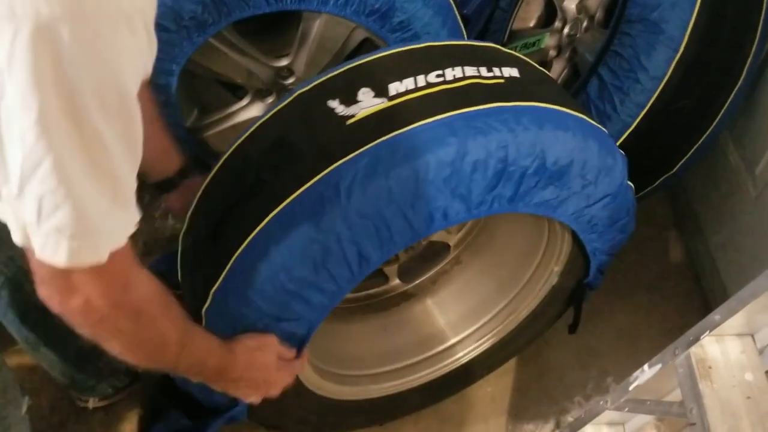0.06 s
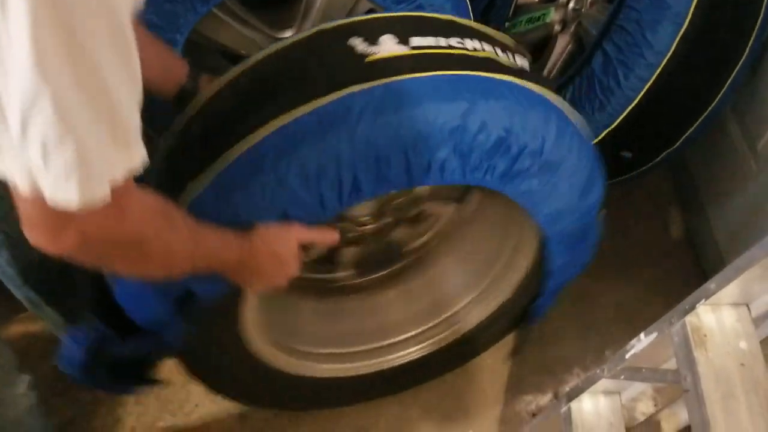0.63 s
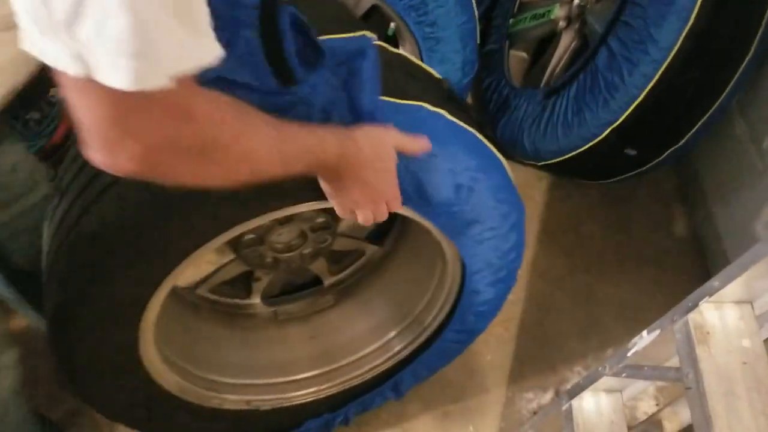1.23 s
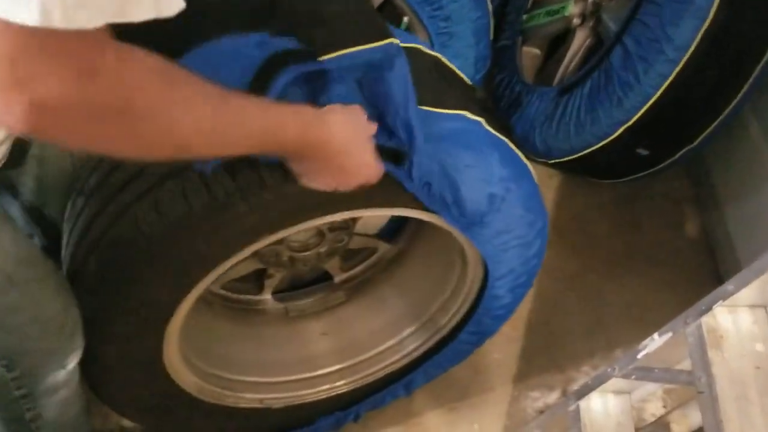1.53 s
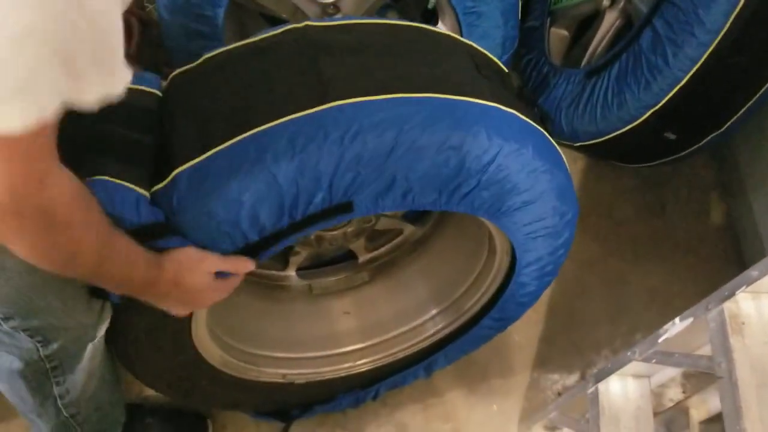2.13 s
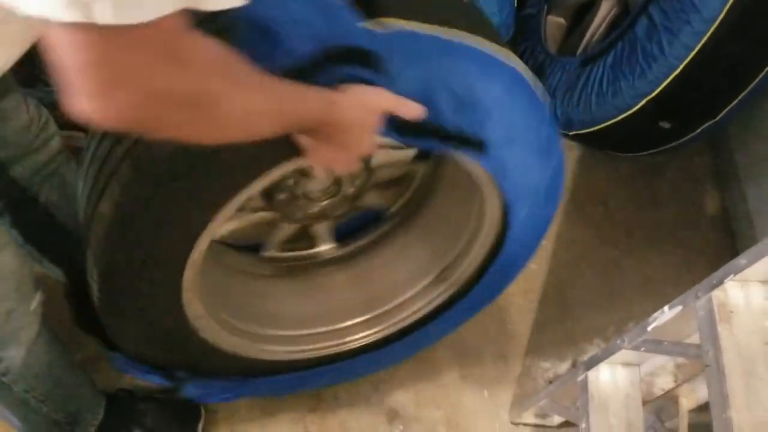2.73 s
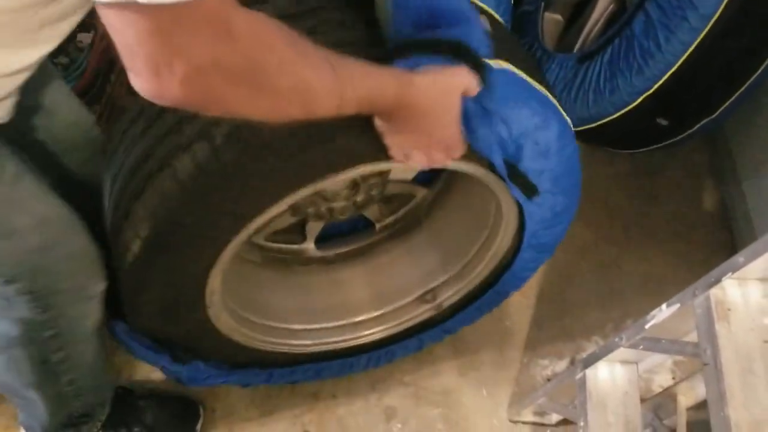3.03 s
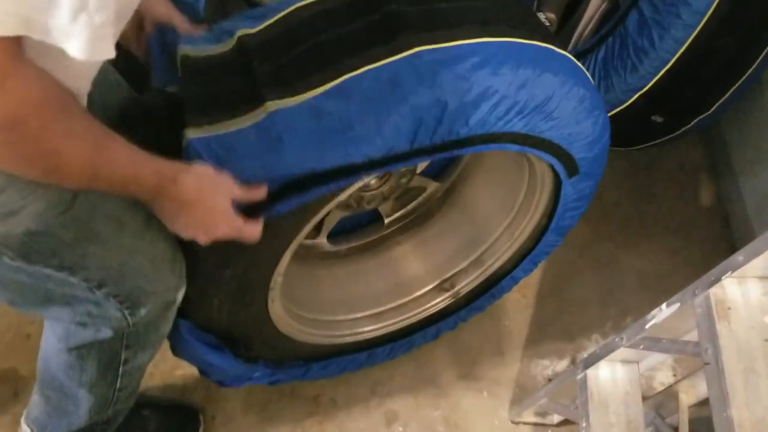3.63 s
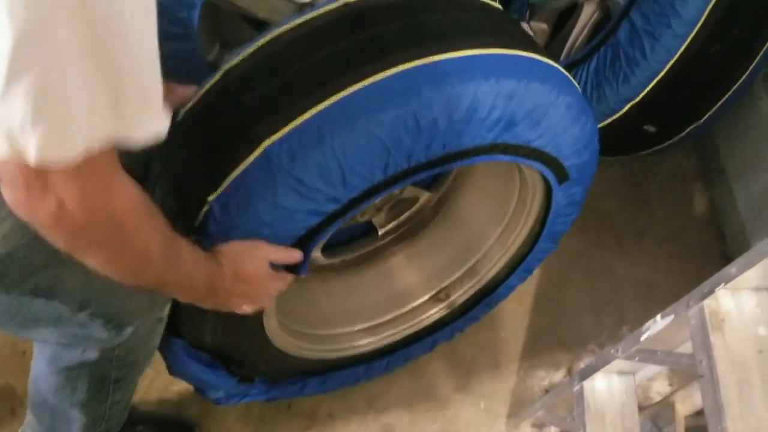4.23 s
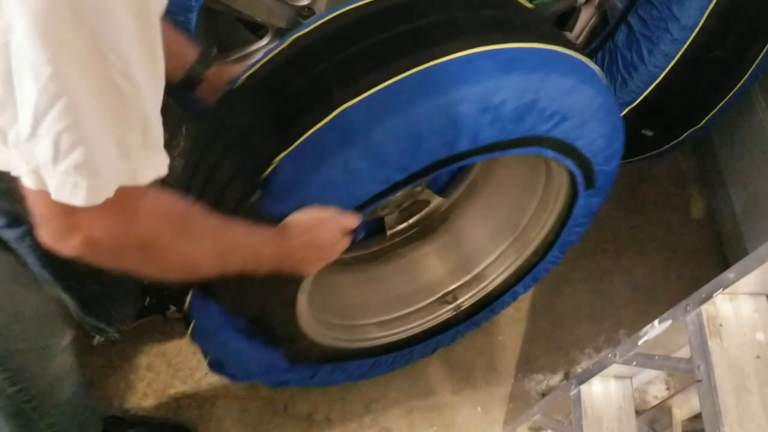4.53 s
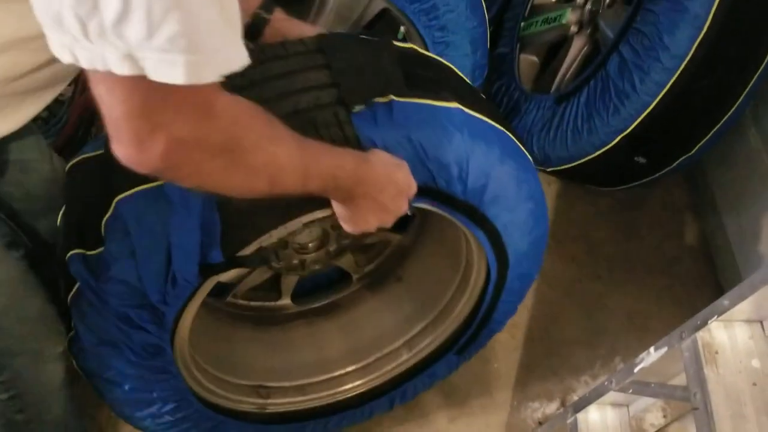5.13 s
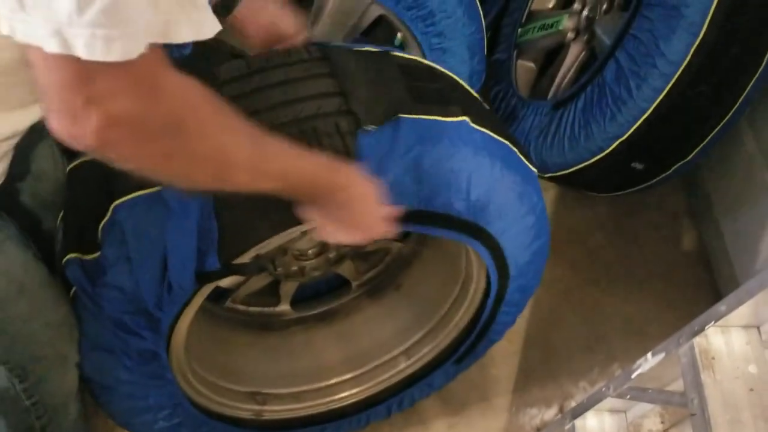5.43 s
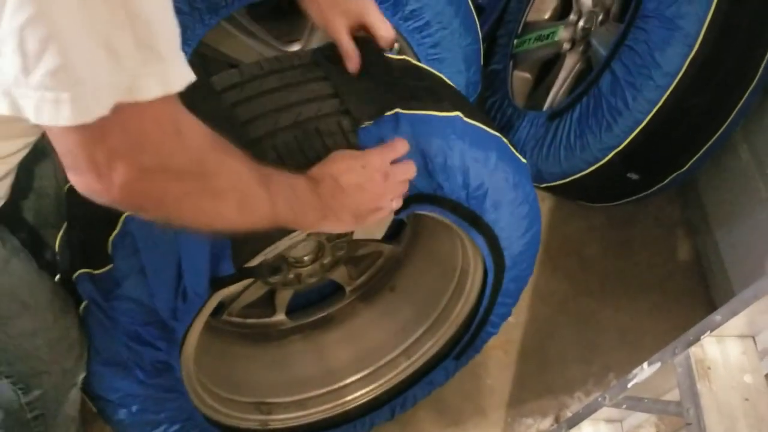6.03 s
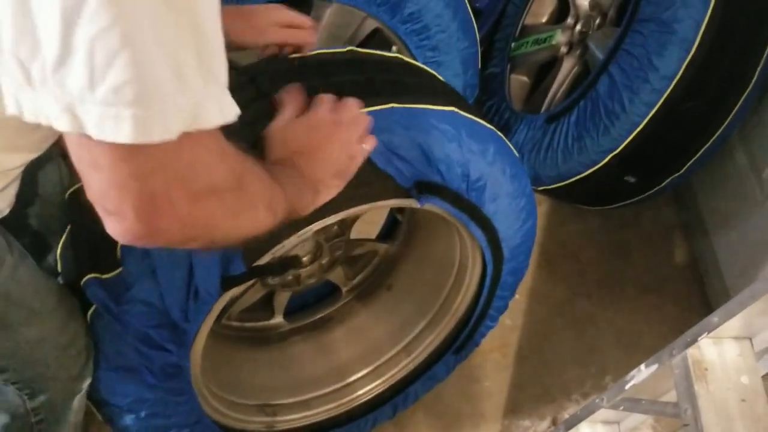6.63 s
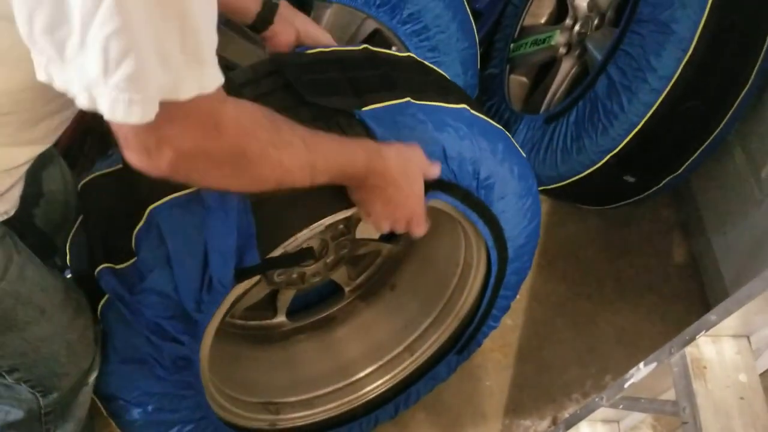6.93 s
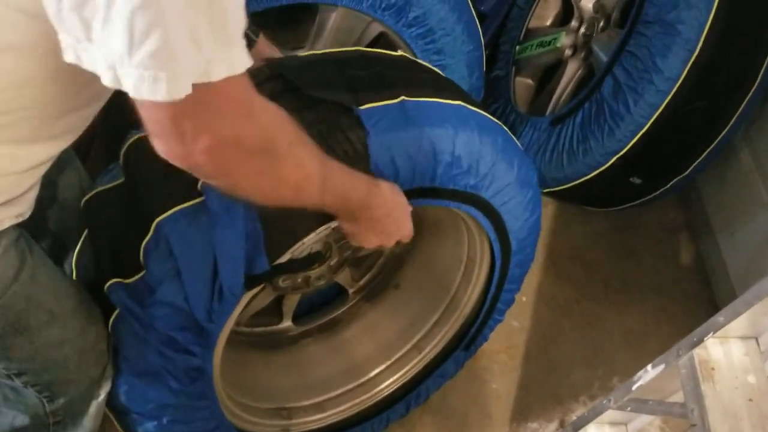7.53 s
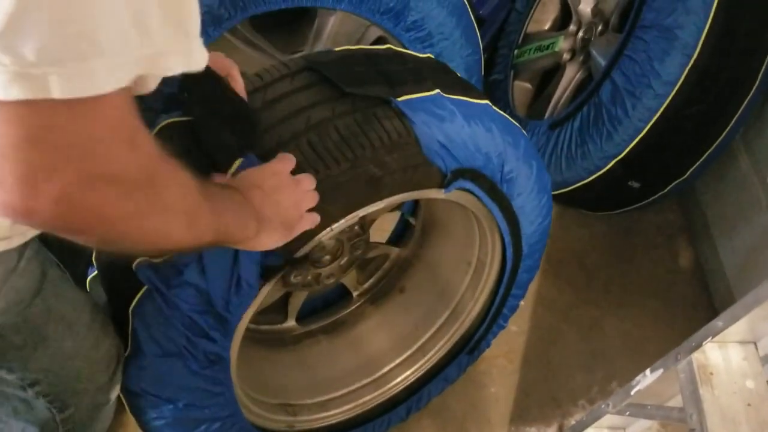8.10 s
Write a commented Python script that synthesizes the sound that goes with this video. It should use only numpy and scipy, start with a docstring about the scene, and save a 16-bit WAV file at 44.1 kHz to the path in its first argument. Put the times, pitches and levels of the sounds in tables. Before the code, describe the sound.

In a garage, a stiff nylon cover is tugged over a car tire, hissing, crinkling and rasping against the tread close to the microphone. Two long pulls come first, and during the second the wheel rocks with a cluster of dull, ringing knocks. Shorter rubs follow, with tiny crease snaps, soft rubber bumps and one sharp rip of sliding cloth near the end. Faint room hum lies underneath.

```python
"""Stiff nylon hisses and crinkles as a cover is tugged, stroke by stroke, over a car tire in a garage.
The weave sticks and slips, rasps on the tread and rips across it in quick jerks; creases snap and
the hem slaps. Hands and knees bump the rubber, and the rocked wheel knocks dully, rings in its air
cavity and rolls a little. Underneath lie room air, a faint hum and a low drone that soon dies away."""
import sys
import numpy as np
from scipy import signal
from scipy.fft import rfft, irfft, next_fast_len
from scipy.io import wavfile

SR = 44100
rng = np.random.default_rng(int(sys.argv[2]) if len(sys.argv) > 2 else 0)


def file_out(sig):
    """Save sig as 16-bit WAV at sys.argv[1]."""
    # one column per channel
    cols = np.atleast_2d(sig).T
    # limit, then scale
    lim = np.clip(cols, -1, 1)
    pcm = np.round(lim * 32767).astype(np.int16)
    wavfile.write(sys.argv[1], SR, pcm)


N = 368670
TIME = np.arange(N) / SR

# Tone curves of the sliding cloth. Each row: frequency in Hz, relative level in dB.
WEAVE_TONE = [(1000, -41), (2000, -10), (3000, -2), (4200, 0), (5300, 0), (7000, -2.5), (8500, -6.5),
              (11000, -9.5), (16000, -26)]
FIBRE_TONE = [(5000, -37), (7500, 3.5), (9500, 2.5), (16000, -5)]
CRUMPLE_TONE = [(600, -27.5), (1100, -1), (1500, 0), (2100, 0.5), (2800, -3), (4000, -8), (8000, -13.5)]
TREAD_TONE = [(90, -22.5), (170, -5), (250, -5), (340, 4), (480, 0), (750, 2.5), (1050, 3), (1400, -0.5),
              (2500, -34)]
CRINKLE_TONE = [(600, -38), (1400, -1.5), (2500, 1), (4000, 3), (7000, 3), (16000, -10)]
BILLOW_TONE = [(30, -23), (70, 1.5), (100, 4.5), (135, -2.5), (200, -3), (280, -17.5), (500, -20.5)]


def sliding_cloth():
    """The weave sticks and slips under one unsteady grip; small folds crackle and slack cloth heaves."""
    hiss, rasp, sizzle = strokes()
    # crumple and heave ride a blend of the hiss and rasp envelopes
    crumple = from_db(-1.17) * hiss * (rasp / hiss) ** 0.48
    slack = from_db(-13) * hiss * (rasp / hiss) ** 0.76
    heave = np.hypot(slack, from_db(-74.5)) * noise(BILLOW_TONE)
    grip_db = 1.26 * drift(30.5)
    weave = hiss * from_db(-3.5 + grip_db + 0.42 * drift(26)) * noise(WEAVE_TONE)
    fibres = sizzle * from_db(6.5 + grip_db) * noise(FIBRE_TONE)
    panels = crumple * from_db(-0.54 + grip_db + 1.2 * drift(60)) * noise(CRUMPLE_TONE)
    tread = rasp * from_db(-0.7 + grip_db + 0.69 * drift(60)) * noise(TREAD_TONE)
    catches = rasp * from_db(-2.5) * grains(TREAD_TONE, per_s=260, spread_db=3.3)
    buckles = crumple * from_db(-7) * grains(CRUMPLE_TONE, per_s=160, spread_db=3.8)
    folds = hiss * from_db(-7.5) * grains(CRINKLE_TONE, per_s=420, spread_db=4.8)
    crackle = garage(folds + buckles + catches, near_db=-3, far_db=-17)
    return echoes(weave + fibres + panels + tread) + heave + crackle


# Two long pulls over the tread, one envelope each.
# Each row: time in seconds, then relative levels of weave hiss, tread rasp and fine sizzle in dB.
LONG_PULLS = [
    [(0.55, -49, -63, -59), (0.582, -54, -68.5, -62), (0.744, -49, -58, -55.5), (0.848, -37.5, -51, -48.5),
     (0.968, -35.5, -51.5, -44.5), (1.052, -40, -52, -49), (1.072, -39, -51.5, -43.5),
     (1.388, -40.5, -54.5, -48), (1.474, -40, -49, -51), (1.5, -46.5, -52.5, -51), (1.566, -41.5, -52, -58),
     (1.682, -30.5, -41, -39), (1.786, -28.5, -37, -38.5), (1.852, -34, -41, -43), (1.91, -32, -47, -41),
     (2.04, -51, -57, -66)],
    [(2.56, -51.5, -75, -66), (2.71, -40.5, -58.5, -48), (2.776, -40, -47, -49), (2.834, -48.5, -59, -57),
     (2.896, -38, -52, -47), (2.964, -47, -54, -50), (3.058, -39.5, -48, -48.5), (3.086, -43, -54, -55),
     (3.144, -36, -52.5, -43.5), (3.2, -43.5, -53.5, -53), (3.318, -34.5, -43.5, -40),
     (3.362, -35, -42, -45), (3.41, -40, -49, -48), (3.508, -31, -44, -40), (3.6, -34, -46, -44.5),
     (3.66, -47, -54.5, -52)],
]
# Short rubs as hands gather, tuck and smooth the cloth. Each row: crest in seconds, relative hiss level
# in dB, rise in seconds, fall in seconds, rasp against hiss in dB, sizzle against hiss in dB.
SHORT_RUBS = [(0.009, -44, 0.034, 0.057, -11, -12), (0.122, -42.5, 0.071, 0.13, -13.5, -7),
              (0.22, -45.5, 0.07, 0.057, -17.5, -5.5), (0.432, -47.5, 0.059, 0.19, -25, -8.5),
              (2.123, -47.0, 0.075, 0.14, -7, -6), (2.198, -45, 0.047, 0.045, -7.5, -8),
              (2.489, -45, 0.099, 0.067, -10, -12), (3.713, -37, 0.044, 0.19, -10, -12.5),
              (3.836, -30.5, 0.02, 0.05, -9.5, -8.5), (4.01, -37.5, 0.026, 0.066, -19, -6),
              (4.07, -41, 0.018, 0.083, -13, -14), (4.197, -46.5, 0.032, 0.11, -22, -7.5),
              (4.673, -57, 0.075, 0.23, -29, -9), (4.914, -46.5, 0.02, 0.048, -10, -9.5),
              (5.038, -47.5, 0.032, 0.043, -12.5, -9), (5.207, -41.5, 0.047, 0.088, -28, -9),
              (5.302, -44, 0.084, 0.16, -9, -8.5), (5.405, -35, 0.037, 0.044, -13.5, -10),
              (5.578, -39, 0.03, 0.048, -23, -9.5), (5.704, -43, 0.027, 0.048, -14.5, -8),
              (5.89, -41, 0.071, 0.067, -16, -9), (5.997, -38.5, 0.025, 0.077, -21, -7.5),
              (6.108, -36.5, 0.071, 0.046, -18, -6), (6.225, -42, 0.085, 0.079, -13.5, -12.5),
              (6.36, -46.5, 0.072, 0.15, -14.5, -8.5), (6.585, -52, 0.042, 0.071, -21, -3),
              (6.693, -44.5, 0.036, 0.077, -25, -7), (6.758, -49.5, 0.035, 0.065, -19.5, -3),
              (6.882, -51, 0.086, 0.17, -38, -4), (7.317, -34.5, 0.064, 0.044, -13, -9),
              (7.451, -45.5, 0.11, 0.069, -13, -6), (7.596, -38, 0.033, 0.077, -16, -11.5),
              (7.806, -44.5, 0.043, 0.062, -12, -5), (7.946, -53, 0.026, 0.067, -9, -4),
              (8.16, -49, 0.047, 0.082, -12.5, -14), (8.246, -44.5, 0.048, 0.028, -15, -14.5),
              (8.344, -39.5, 0.034, 0.076, -12, -13)]


def strokes():
    """Envelopes of hiss, rasp and sizzle: every pull and rub of the cloth, summed in power."""
    rest = from_db([-61.5, -82, -77])  # held cloth never lies quite still
    power = np.outer(rest ** 2, np.ones(N))
    pull_fade_s = 0.045
    for pull in LONG_PULLS:
        s, hiss_db, rasp_db, sizzle_db = np.transpose(pull)
        gains = from_db([np.interp(TIME, s, db) for db in (hiss_db - 0.7, rasp_db + 1.35, sizzle_db)])
        outside_s = np.abs(TIME - np.clip(TIME, s[0], s[-1]))
        fade = np.exp(-np.minimum(outside_s / pull_fade_s, 20))
        power += (gains * fade) ** 2
    for s, db, rise, fall, rasp_db, sizzle_db in SHORT_RUBS:
        span = slice(*np.searchsorted(TIME, [s - 4 * rise, s + 4 * fall]))
        from_crest = np.maximum((s - TIME[span]) / rise, (TIME[span] - s) / fall)
        swell = np.exp(-from_crest ** 1.42)  # exponent 1 is a pointed crest, 2 a bell
        power[:, span] += np.outer(from_db([db, db + rasp_db, db + sizzle_db]), swell) ** 2
    return np.sqrt(power)


# Quick jerks of the cloth. Each row: crest in seconds, level in dB, rise in seconds, decay in seconds.
CLOTH_JERKS = [(0.125, -33, 0.0025, 0.0081), (1.095, -42, .008, 0.017), (3.838, -38, 0.0088, 0.026),
               (4.01, -42, .004, 0.012), (5.88, -32, .008, 0.009), (7.588, -20, 0.0037, 0.014)]
# Their bright rip. Each row: frequency in Hz, relative level in dB.
RIP_TONE = [(200, -23.5), (900, -8.5), (2200, -5.5), (3400, 2), (6500, 4.5), (10000, 2.5), (16000, -10)]


def jerks():
    """A sudden pull rips the weave across the rubber in a dense burst of slips."""
    speed = sum(from_db(db) * np.exp(-np.maximum((s - TIME) / rise, (TIME - s) / decay))
                for s, db, rise, decay in CLOTH_JERKS)
    slips = grains(RIP_TONE, per_s=9000, spread_db=0.64)
    return garage(speed * slips, near_db=-7.5, far_db=-38)


# The sharpest creases letting go. Each row: start in seconds, relative level in dB, pitch in Hz.
CREASE_SNAPS = [(0.008, -24, 6400), (0.1235, -26, 5660), (0.400, -23, 3440), (0.407, -27, 6500),
                (0.515, -26.5, 3700), (1.4595, -16.5, 3400), (3.3047, -19, 4900), (3.704, -19, 4760),
                (3.783, -22, 4100), (3.813, -19.5, 3150), (3.985, -26, 6200), (4.213, -26, 3080),
                (4.225, -27.5, 2540), (4.261, -35, 2700), (4.386, -28, 3570), (4.641, -37, 3450),
                (4.676, -38, 3800), (5.30, -22.5, 2710), (5.3747, -17, 2100), (5.541, -25, 4830),
                (5.818, -29, 1500), (5.937, -21.5, 2300), (6.107, -21, 1700), (6.572, -25.5, 6200),
                (7.7745, -29, 6030), (8.3098, -24.5, 3600)]
# The hem hitting the wheel.
# Each row: start in seconds, relative level in dB, pitch in Hz, ring time (t60) in seconds.
HEM_SLAPS = [(6.205, -16.5, 1970, 0.011), (6.4045, -25.5, 2160, 0.0072), (6.413, -34, 2600, 0.0053),
             (6.571, -36, 1550, 0.0056)]


def snaps_and_slaps(crease_t60=0.0036):
    """Creases tick briefly as they snap; the slapping hem rings lower and longer."""
    creases = [(*row, crease_t60) for row in CREASE_SNAPS]
    snaps = from_db(-4) * flicks(creases, crack_t60=0.0065, crack_db=-5)
    slaps = from_db(-3) * flicks(HEM_SLAPS, crack_t60=0.013, crack_db=-3)
    return garage(snaps, near_db=-3, far_db=-2) + garage(slaps, near_db=2, far_db=-4.5, near_t60=0.1)


def flicks(rows, crack_t60, crack_db):
    """Taut cloth lets go: a crack and a short ring of the panel, its phase lagging on the left."""
    out, t = np.zeros((2, N)), TIME[:SR // 10]
    cracks = colour(rng.standard_normal((2, N)), CRINKLE_TONE)
    for k, (s, db, hz, ring_t60) in enumerate(rows):
        ring = np.sin(2 * np.pi * hz * t - [[np.pi / 3], [0]]) * from_db(-60 * t / ring_t60)
        crack = cracks[:, k * len(t):(k + 1) * len(t)] * from_db(crack_db - 60 * t / crack_t60)
        add(out, s, from_db(db) * (ring + crack))
    return out


# The wheel knocking as it rocks. Each row: start in seconds, relative level in dB.
WHEEL_KNOCKS = [(2.751, -32.5), (2.8985, -24), (2.939, -31.5), (3.023, -25), (3.130, -24), (3.216, -33.5),
                (3.364, -33.5), (4.895, -46.5), (6.465, -48.5), (6.735, -50)]
# Modes of tire and rim. Each row: pitch in Hz, relative level in dB, ring time (t60) in seconds.
WHEEL_MODES = [(99, -24.5, 0.35), (198.6, -23.5, 1.1), (230, -32, 0.11), (311, -8.5, 0.069),
               (390, -1.5, 0.032), (453, -7.5, 0.077), (557, -16, 0.053), (727, -13, 0.076),
               (902, -7, 0.087), (1060, -17, 0.12), (1380, -21, 0.071), (1670, -26, 0.035)]
# The dry attack of a knock. Each row: frequency in Hz, relative level in dB.
TOCK_TONE = [(200, -48), (500, 13), (800, 11), (1600, 14), (2000, -25), (4000, -42)]


def wheel_knocks(tock_t60=0.046):
    """Each knock gives a dry tock and rings carcass, air cavity and rim."""
    out, t = np.zeros((2, N)), TIME[:SR]
    contact = noise(TOCK_TONE)
    for s, db in WHEEL_KNOCKS:
        vary_db = 1.8 * rng.standard_normal(len(WHEEL_MODES))
        ring = np.zeros(len(t))
        for k, (hz, mode_db, t60) in enumerate(WHEEL_MODES):
            polarity = (-1) ** (k // 3)  # groups of modes swing in opposite sense
            ring += polarity * from_db(mode_db + vary_db[k] - 60 * t / t60) * np.sin(2 * np.pi * hz * t)
        start = int(s * SR)
        tock = contact[:, start:start + len(t)] * from_db(-1.5 - 60 * t / tock_t60)
        add(out, s, from_db(db) * (ring + tock))
    return from_db(-5.5) * garage(out, near_db=-25, far_db=-3.5)


# Hand and knee meeting the tire. Each row: start in seconds, level in dB, pitch in Hz.
RUBBER_BUMPS = [(1.70, -46, 169), (1.756, -40, 238), (1.833, -41, 90), (2.765, -45.5, 161),
                (2.805, -42, 88), (5.386, -50, 137), (5.825, -56, 104), (6.675, -53, 110),
                (7.274, -44.5, 167), (7.306, -48.5, 145)]


def bumps(swell_s=0.0093):
    """Damped rubber answers a soft push with a few dull cycles that swell and fade."""
    out, t = np.zeros((2, N)), TIME[:SR // 4]
    envelope = t / swell_s * np.exp(1 - t / swell_s)
    for s, db, hz in RUBBER_BUMPS:
        add(out, s, from_db(db) * envelope * np.sin(2 * np.pi * hz * t))
    return garage(out, near_db=-17, far_db=-8.5)


# Short rolls on the floor. Each row: start in seconds, time to release in seconds, relative level in dB.
TIRE_ROLLS = [(2.76, 0.31, -52.5), (4.885, 0.053, -65)]
# Their low rumble. Each row: frequency in Hz, relative level in dB.
RUMBLE_TONE = [(15, -11), (30, 8), (60, -29), (80, -10), (97, 18), (120, -47), (200, -32), (400, -35)]


def rolling(attack_s=0.02, release_db_per_s=44):
    """The rolling tire rumbles unevenly and shakes the slack cloth, then settles."""
    envelope = np.zeros(N)
    for s, length, db in TIRE_ROLLS:
        attack = np.clip((TIME - s) / attack_s, 0, 1)
        envelope += attack * from_db(db - release_db_per_s * np.maximum(TIME - s - length, 0))
    wobble = from_db(2 * drift(25))
    return envelope * wobble * (noise(RUMBLE_TONE) + from_db(3) * noise(BILLOW_TONE))


# The air of the garage. Each row: frequency in Hz, relative level in dB.
AIR_TONE = [(20, -4), (60, 13), (110, 9.5), (170, -15), (280, -22), (700, -48), (3000, -36), (16000, -21)]


def room_tone(hum_hz=58.8, drone_hz=93.6, drone_hold_s=0.8, fade_db_per_s=42):
    """Room air and a faint hum stay throughout; a low drone holds, then dies away."""
    hum = from_db(-70 + drift(4.3)) * np.sin(2 * np.pi * hum_hz * TIME)
    drone_level = from_db(-60 - fade_db_per_s * np.maximum(TIME - drone_hold_s, 0))
    drone = drone_level * np.sin(2 * np.pi * drone_hz * TIME + 0.56 * drift(1.9))
    return np.sqrt(2) * (hum + drone) + from_db(-70) * noise(AIR_TONE)


# Early reflections off floor, wheel and arm. Each row: left delay in ms, right delay in ms, level in dB.
REFLECTIONS = [(3.7, 3.4, -18.5), (6.1, 6.9, -20.5), (9.4, 7.6, -10.5), (13.3, 14.9, -15)]


def echoes(x):
    """Nearby surfaces comb the rustle with a fine, unmoving ripple."""
    out = x.copy()
    for left_ms, right_ms, db in REFLECTIONS:
        for side, ms in enumerate((left_ms, right_ms)):
            out[side] += from_db(db) * np.interp(TIME - ms / 1000, TIME, x[side], left=0)
    return out


def garage(x, near_db, far_db, near_t60=0.045, far_t60=0.58):
    """Direct sound, quick scatter from wheel and floor, then the tail of the room."""
    t = TIME[:SR // 2]
    near, far = rng.standard_normal((2, 2, len(t)))
    near = near * from_db(-60 * t / near_t60) * (t > .001)
    far = far * from_db(-60 * t / far_t60) * (t > .008)
    response = (from_db(near_db) * rms_one(near) + from_db(far_db) * rms_one(far)) / np.sqrt(len(t))
    return x + convolve(x, response)


# Stereo image of the noise layers. Each row: frequency in Hz, left-right likeness from 0 to 1.
STEREO_LIKENESS = [(60, 0.63), (300, 1), (700, 0.36), (2000, 0.39), (3500, 0.13), (16000, .02)]


def noise(tone):
    """Stereo noise shaped by a tone curve, narrow in the bass and wide in the treble; rms 1."""
    size = next_fast_len(N, True)
    hz = np.fft.rfftfreq(size, 1 / SR)
    alike = np.clip(at_hz(STEREO_LIKENESS, hz), 0, 1)
    mid, side = rfft(rng.standard_normal((2, size)))
    stereo = np.sqrt(1 + alike) * mid + np.sqrt(1 - alike) * side * [[1], [-1]]
    return rms_one(irfft(stereo * from_db(at_hz(tone, hz)), size)[:, :N])


def grains(tone, per_s, spread_db):
    """Tiny clicks of uneven size from all over the cloth, each with its own left-right lag; rms 1."""
    at = np.flatnonzero(rng.random(N) < per_s / SR)
    size = from_db(spread_db * np.minimum(rng.exponential(1, N), 3.4)) * rng.choice([-1, 1], N)
    lag = rng.integers(-9, 10, N)  # samples
    clicks = np.zeros((2, N))
    clicks[0, at] = size[at]
    clicks[1, (at + lag[at]) % N] = size[at]
    return rms_one(colour(clicks, tone))


def drift(rate_hz, hop=20):
    """Smooth random modulation; rms about 1."""
    pole = np.exp(-2 * np.pi * rate_hz * hop / SR)
    white = rng.standard_normal(2 * N // hop)
    slow = signal.lfilter([1], [1, -2 * pole, pole * pole], white)[-(N // hop):]
    return np.interp(np.arange(N) / hop, np.arange(len(slow)), rms_one(slow))


def colour(x, tone, column=1, size=4096):
    """Minimum-phase EQ that follows a tone curve."""
    gain = from_db(at_hz(tone, np.fft.rfftfreq(size, 1 / SR), column))
    cepstrum = irfft(np.log(gain))
    cepstrum[1:size // 2] *= 2
    cepstrum[size // 2 + 1:] = 0
    return convolve(x, irfft(np.exp(rfft(cepstrum))))


def at_hz(points, hz, column=1):
    """Read a column of a table on a log-frequency axis."""
    table = np.array(points)
    return np.interp(np.log(hz + 1), np.log(table[:, 0]), table[:, column])


def convolve(x, response):
    """Filter one or two channels."""
    return signal.fftconvolve(np.atleast_2d(x), np.atleast_2d(response), axes=1)[:, :N]


def add(out, s, sound):
    """Mix a short sound in at s seconds."""
    start = int(np.clip(s * SR, 0, N - 1))
    out[:, start:start + sound.shape[-1]] += sound[..., :N - start]


def from_db(db):
    """Decibels to gain."""
    return 10 ** (np.asarray(db) / 20)


def rms_one(x):
    """Scale to unit rms."""
    return x / np.sqrt(np.mean(x ** 2) + 1e-20)


def scene():
    """Cloth, wheel and room together."""
    cloth = sliding_cloth() + jerks() + snaps_and_slaps()
    wheel = bumps() + wheel_knocks() + rolling()
    return cloth + wheel + room_tone()


# EQ of the two microphone ports. Each row: frequency in Hz, left gain in dB, right gain in dB.
PORT_EQ = [(500, 1, 2.5), (740, -0.5, -3), (1510, -1, 0.5), (2530, 1.5, 4), (4460, 0.5, 8), (5400, 0, 11.5),
           (5780, 1, 4.5), (6780, -3, 8), (7790, -7.5, -8), (8600, -6, -5.5), (10550, -1, 0),
           (12300, -0.5, -1.5), (13900, -1, -9.5), (16200, -2, -26)]


def record(dry, cutoff_hz=15900):
    """Each microphone port adds its own resonances; a steep low-pass cuts the top."""
    heard = np.vstack([colour(dry[0], PORT_EQ, column=1), colour(dry[1], PORT_EQ, column=2)])
    return signal.sosfilt(signal.ellip(12, .1, 80, cutoff_hz, fs=SR, output="sos"), heard)


dry = scene()
out = record(dry)
file_out(out)
```